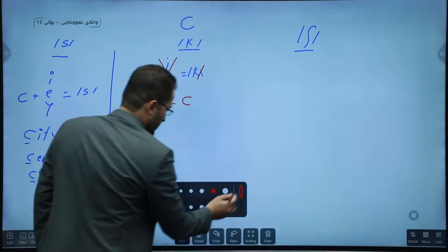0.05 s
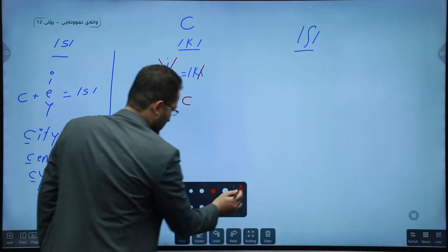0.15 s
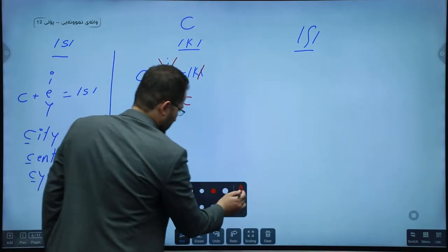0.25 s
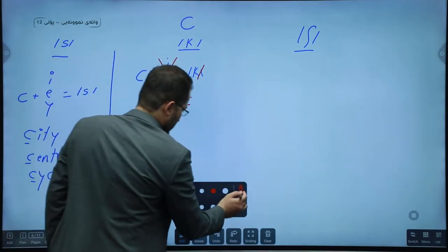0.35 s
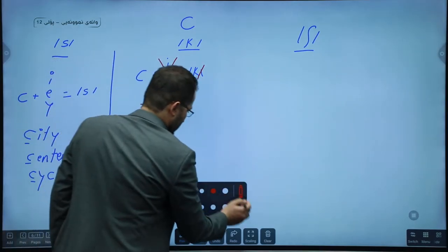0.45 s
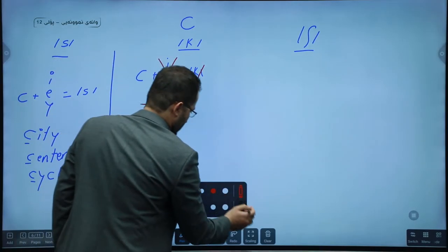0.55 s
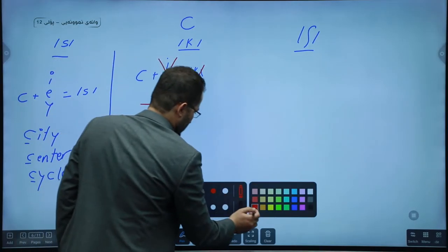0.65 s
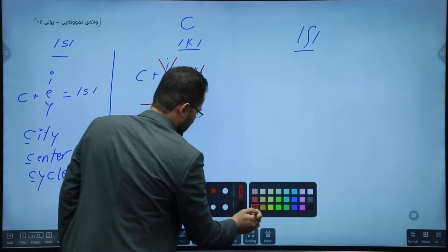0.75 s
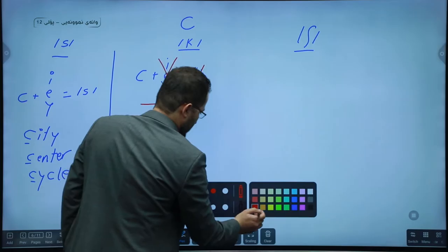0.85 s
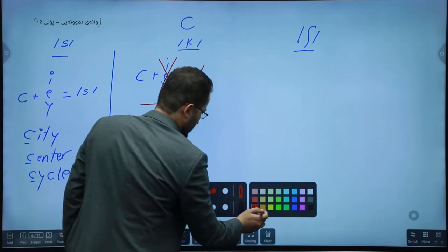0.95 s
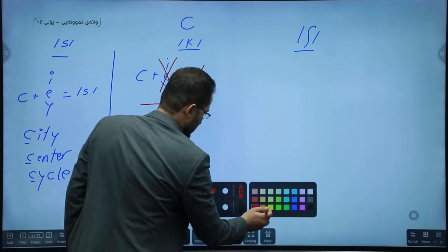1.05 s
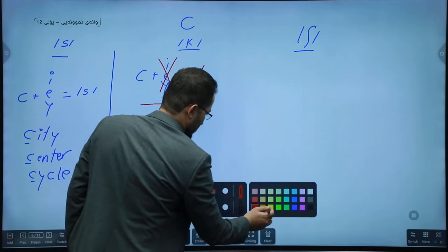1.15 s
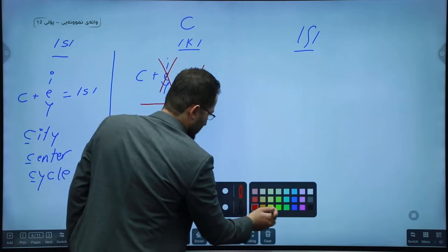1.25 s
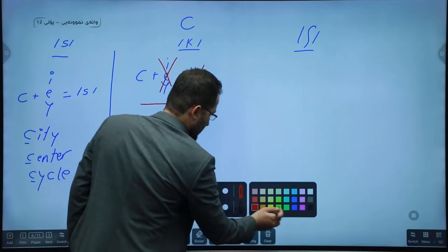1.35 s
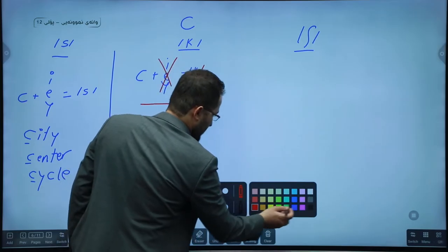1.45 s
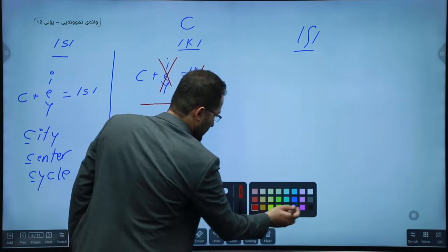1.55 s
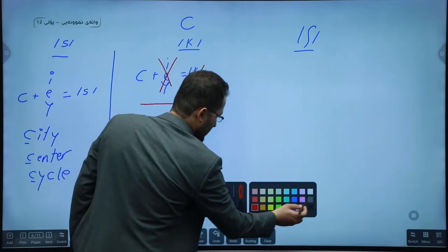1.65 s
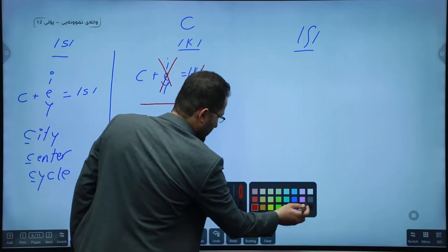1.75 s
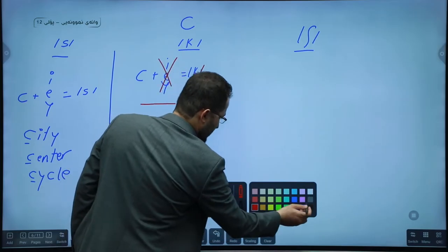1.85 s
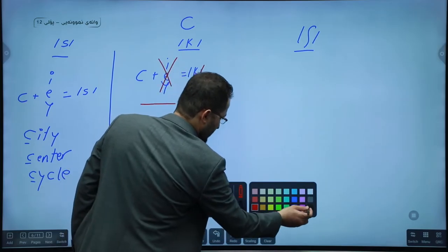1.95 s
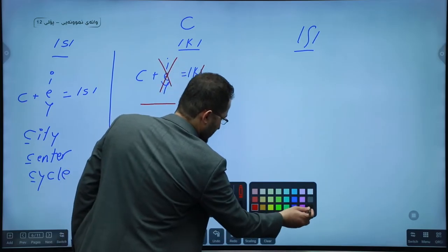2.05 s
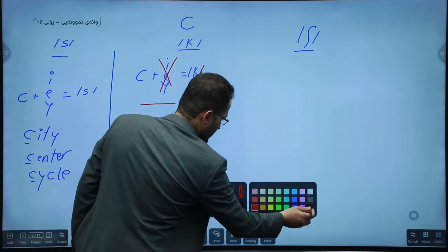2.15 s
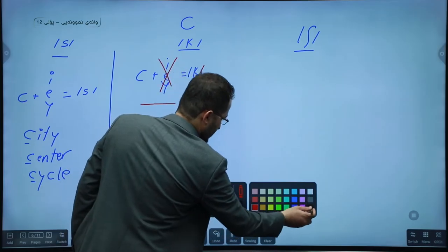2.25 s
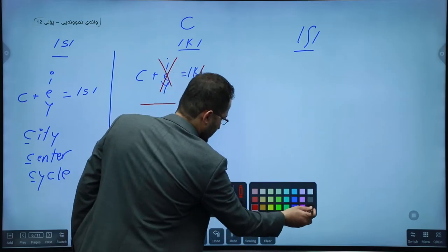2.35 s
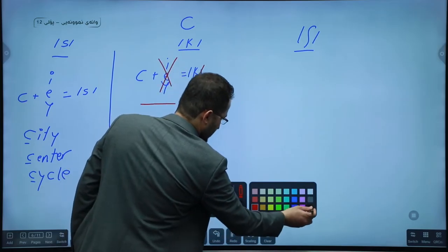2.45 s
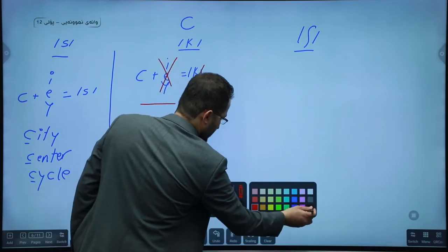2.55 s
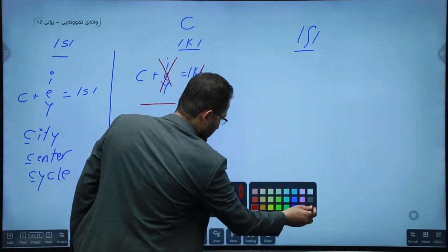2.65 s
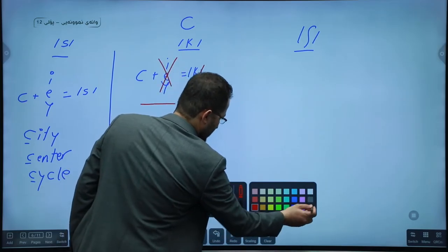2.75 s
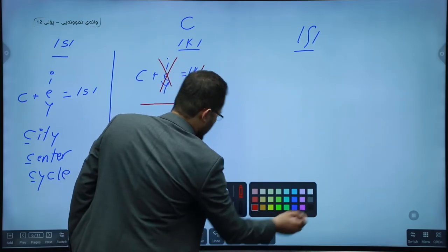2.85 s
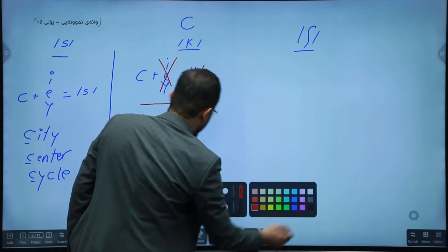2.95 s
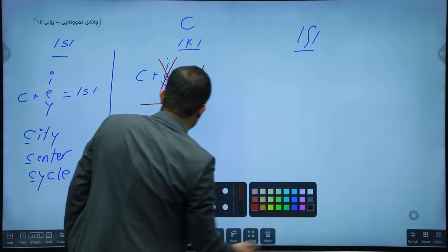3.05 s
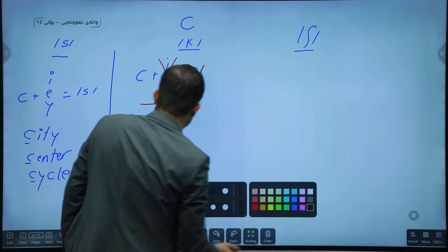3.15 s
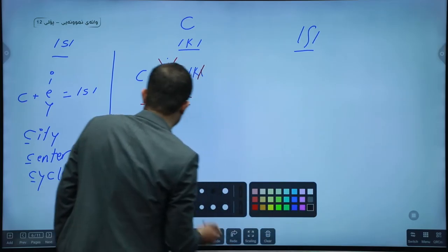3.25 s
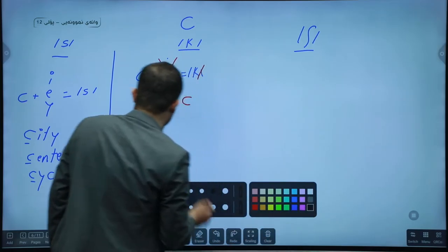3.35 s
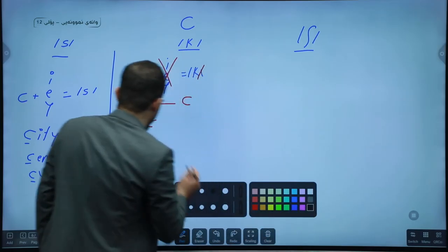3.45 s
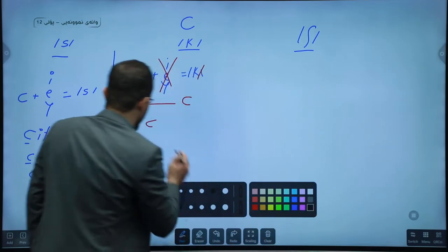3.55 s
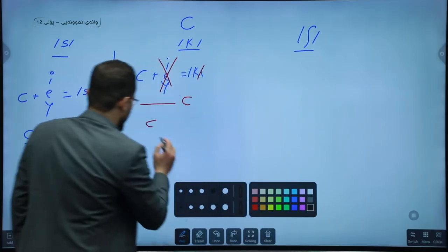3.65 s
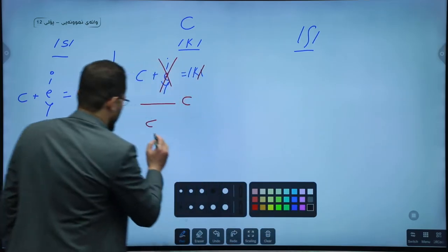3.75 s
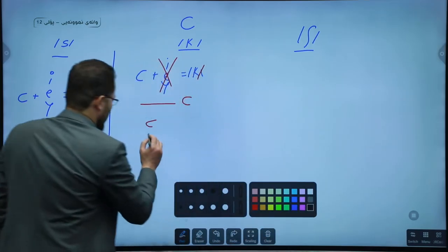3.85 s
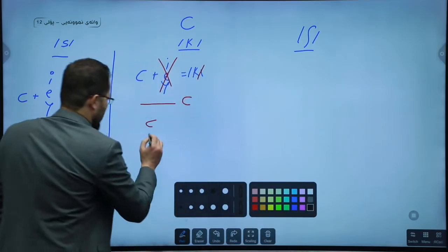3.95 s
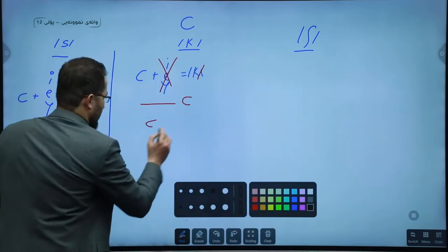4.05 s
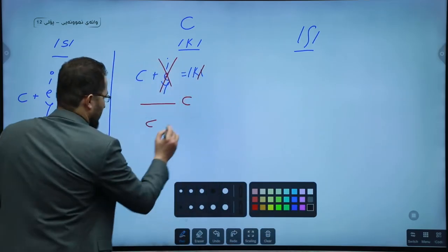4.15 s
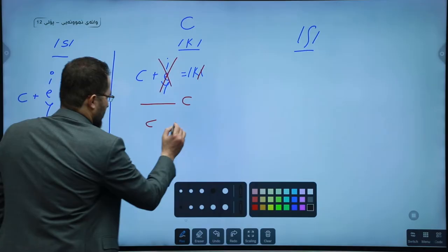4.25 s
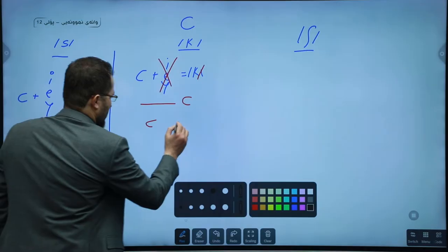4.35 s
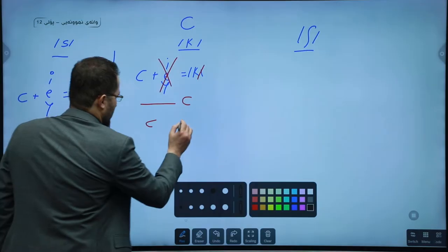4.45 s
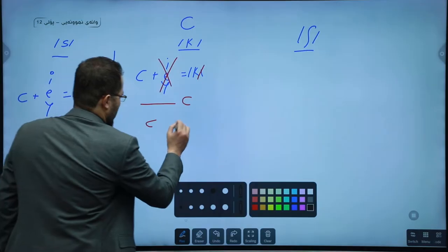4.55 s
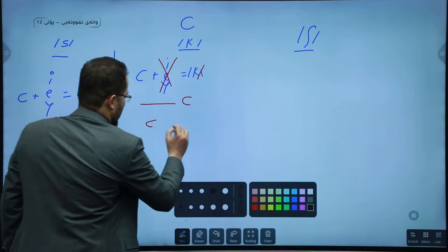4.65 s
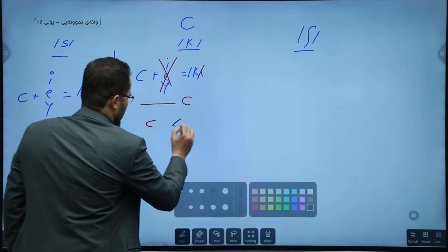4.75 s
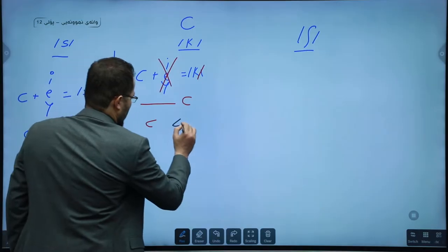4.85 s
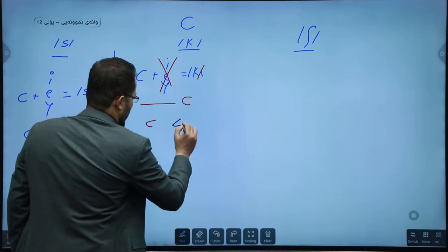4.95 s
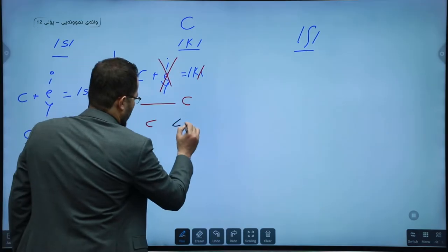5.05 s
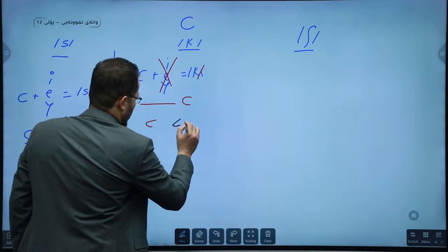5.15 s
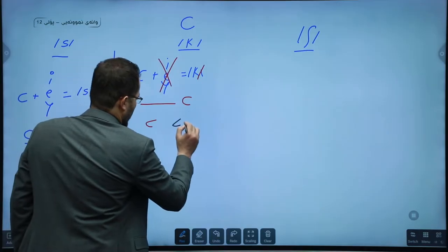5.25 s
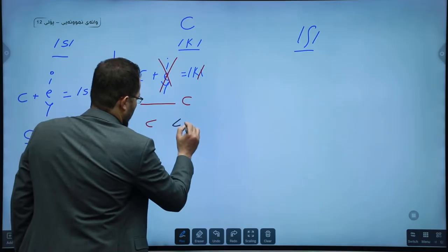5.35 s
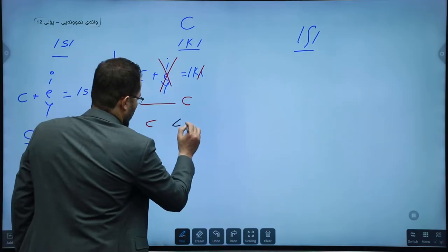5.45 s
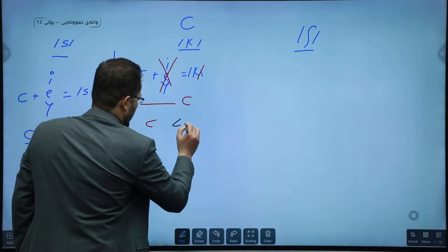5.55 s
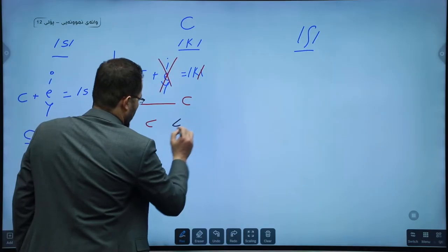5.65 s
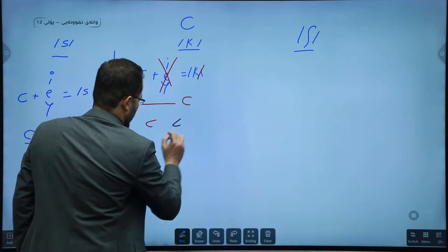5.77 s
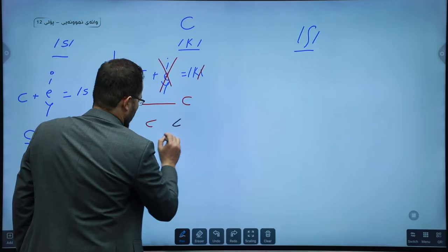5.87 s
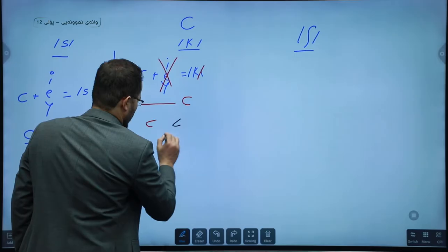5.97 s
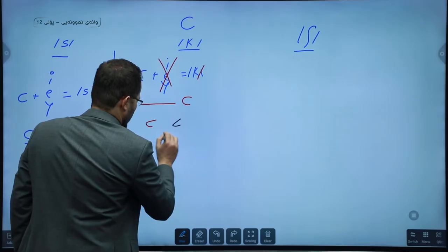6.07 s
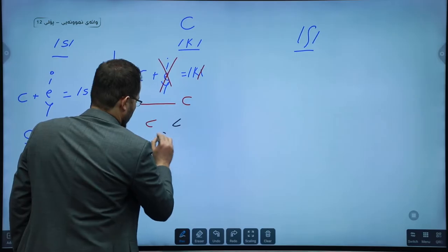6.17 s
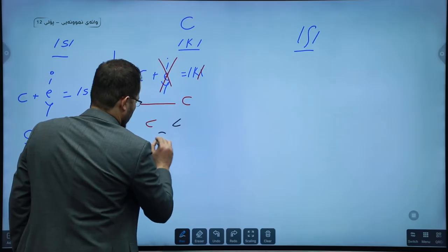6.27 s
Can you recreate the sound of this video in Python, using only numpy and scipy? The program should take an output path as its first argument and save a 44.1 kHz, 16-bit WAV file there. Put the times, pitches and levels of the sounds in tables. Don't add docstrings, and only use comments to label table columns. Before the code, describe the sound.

A quiet classroom with low ventilation rumble, a soft wash of air and steady microphone hiss throughout. At about 0.26 s a stylus strikes a large glass panel a few metres away: a loud, blunt thump with a hard tick, a hollow ring and a fluttering room tail lasting under a second. A slow, very faint sleeve movement follows near 0.9 s, with a barely audible squeak around 1.4 s. A second, slightly weaker knock lands at 2.65 s. From 3.1 to 4.2 s a jacket sleeve rubs, swishing most clearly at 4.0 s, with small body bumps. A softer, boomier knock comes at 4.56 s, then a thin faint squeak at 4.7-4.9 s. Soft low hand touches occur at 5.1, 5.3 and 5.5 s. From 5.85 s a low distant engine drone swells, sagging slightly, and a final dull thud without a noticeable tick sounds at 6.08 s, ringing until the end at about 6.3 s.

```python
import sys
import numpy as np
from scipy import signal
from scipy.fft import rfft, irfft
from scipy.io import wavfile
from scipy.ndimage import uniform_filter1d

SR = 44100
rng = np.random.default_rng(int(sys.argv[2]) if len(sys.argv) > 2 else 0)


def waveform_to_disk(signal):
    frames = np.transpose(np.atleast_2d(signal))
    scaled = np.clip(frames, -1, 1) * 32767
    samples = np.round(scaled).astype(np.int16)
    wavfile.write(sys.argv[1], SR, samples)


def magnitude_from_level(level_db):
    exponent = np.asarray(level_db, float) / 20
    return 10 ** exponent


N = 278271
TIME = np.arange(N) / SR

# time in seconds, level in dB.
AIR_FLOW = [(0, 2), (.9, -0.5), (2.2, -1.5), (3.1, 0), (4.9, 0), (5.5, 0.5), (6.31, 2.5)]
# frequency in Hz, level in dB per Hz.
RUMBLE_COLOUR = [(22, -32), (59, -5), (70, -6.5), (91, 1), (119, -8), (146, -3.5), (254, -13), (330, -25.5)]
# frequency in Hz, level in dB per Hz.
WASH_COLOUR = [(200, -28), (312, -22), (392, -19.5), (450, -23.5), (838, -24.5), (3000, -43.5),
               (3900, -55.5), (6600, -120)]
# frequency in Hz, width in Hz, level in dB.
DUCT_MODES = [(100.2, 10, -69.5), (244.5, 15, -71)]
RUMBLE_DB, WASH_DB, RUMBLE_GROWS_DB_PER_S = -60.5, -68.5, 0.35

# frequency in Hz, level in dB per Hz.
HISS_COMMON = [(590, -18), (1000, -2.5), (1230, -3.5), (1630, -4.5), (2620, -5), (3190, -5), (13600, -8),
               (16000, -9)]
# frequency in Hz, level in dB per Hz.
HISS_DIFFERING = [(18, -38), (30, -11), (71, -11), (336, -6.5), (1190, -7.5), (3140, -8), (13700, -8.5),
                  (16000, -10)]
HISS_COMMON_DB, HISS_DIFFERING_DB = -65, -67

# start in seconds, thump peak in dB, thump pitch in Hz, tick in dB, flutter depth in dB.
BLOWS = [
    (0.2572, -12, 540, -26.5, -1),
    (2.6536, -17, 530, -30.5, -1.5),
    (4.5557, -22, 520, -37, 8.5),
    (6.0752, -26, 448, -68.5, 4),
]
# frequency in Hz, level in dB, t60 in seconds.
MENU_RING = [(190.7, -18, 0.88), (258, 3.5, 0.18), (294.4, -13.5, 0.76), (426, -8, 0.51), (491, -12, 0.23),
             (680, -33, 0.48), (864, -14.5, 0.36), (914, -14, 0.35), (996, -22.5, 0.59), (1255, -33, 0.49),
             (1160, -27, 0.46), (629, -21, .3)]
# frequency in Hz, level in dB, t60 in seconds.
CORNER_RING = [(217, -9, 0.17), (252.5, 2.5, 0.22), (304, -8, 0.75), (389, -12, 0.57), (453, -19, 0.28),
               (590, -7, 0.43), (676, 5.5, 0.089), (820, -13, 0.22), (888, -21, 0.6), (903, -25, 0.36),
               (1127, -38, 0.98)]
# frequency in Hz, level in dB, t60 in seconds.
MIDDLE_RING = [(102, -15, 0.31), (139, -6.5, 0.62), (242.5, -11.5, 0.96), (377.5, 9.5, 0.093),
               (423, -11, 0.41), (490, -24, 0.28), (520, -28, 0.41), (638, -26, 0.18), (652, 0, 0.13),
               (749, -2.5, 0.16), (835, -25, 0.45), (970, -42, 0.55), (191, -3, 0.25)]
# frequency in Hz, level in dB, t60 in seconds.
LOWER_RING = [(137, -0.5, 0.42), (235, 4, 0.33), (333, -7.5, 0.58), (394.4, 0, 0.23), (426, -22, .7),
              (547, -17, 0.19), (604, -1, 0.11), (689, -30, 0.3), (790, -30, 0.25), (870, -30, 0.23),
              (187.6, -2, 0.52), (1230, -41, .6)]
# frequency in Hz, level in dB, t60 in seconds.
ROOM_HUM = [
    [(152.6, -9, 0.79), (180, 1.5, 0.59), (221.4, -5, 0.76), (246, -2.5, 0.78)],
    [(163.3, -3, 0.88), (209.6, 1.5, 0.87), (251, -4.5, 0.98), (327.5, -4.5, 0.75)],
    [(151.3, -11, 0.85), (180, -6.5, 0.97), (218, 6, 0.56), (239, 4.5, 0.78)],
    [(142.7, -4, 0.97), (218, 3, 1.1), (259, -1.5, 2), (176, -0.5, 0.8)],
]
# frequency in Hz, level against the thump in dB, t60 in seconds.
SHAFT_RING = [(1270, -24.5, 0.033), (1860, -41, 0.011)]
# frequency in Hz, level in dB, t60 in seconds.
TIP_RING = [(2300, -6, 0.0045), (3780, -11.5, 0.0074), (5000, -5, 0.0038), (6200, -7.5, 0.0025),
            (8200, -1.5, 0.001), (12400, -7.5, 0.0032)]
# frequency in Hz, level in dB per Hz.
ROOM_COLOUR = [(60, -45), (140, -6), (200, -12.5), (280, 0), (400, -7), (600, -7), (1200, -28),
               (2300, -34.5)]
# frequency in Hz, level in dB per Hz.
BRIGHT_COLOUR = [(1100, 8), (1500, -12), (2500, -7), (4000, -7), (6500, -11), (9000, -11), (15000, -20.5)]
# frequency in Hz, t60 in seconds.
ROOM_DECAY = [(100, 0.64), (250, 0.64), (600, 0.35), (1500, 0.83), (3000, 0.14), (6000, 0.07),
              (12000, 0.15)]
RING_DB, HUM_DB, ROOM_DB, BRIGHT_DB = -11.5, -15.5, -13.5, -32.5
ROOM_SLOPE, BRIGHT_SLOPE = 1.132, 1.41
RECOIL_DB, RECOIL_HZ, RECOIL_T60_S = -8, 190, .035
ECHO_S, ECHO_DB = 0.012, -6
FLUTTER_S, FLUTTER_FIRST_S = 0.0462, .016
FLUTTER_TOP_HZ, FLUTTER_FADE_S = 504, 0.21
SOFT_TURNS = 2.07
BLOW_LOW_CUT_HZ = 36

# frequency in Hz, width in Hz, level in dB.
CLOTH_FOLDS = [
    [(655, 210, 5.5), (854, 250, 5)],
    [(1650, 350, 4), (2100, 810, 10.5)],
    [(3380, 2200, 17), (5800, 2200, -10)],
]
# time of the height in seconds, level in dB, rise in seconds, fall in seconds,
# brightness in dB.
SLEEVE_STROKES = [
    (.9, -74.5, 0.54, 0.58, -14),
    (3.12, -70, 0.18, 0.14, 3.5),
    (3.48, -67, 0.11, .25, -4),
    (3.75, -73, 0.19, 0.14, 3.5),
    (3.884, -66, 0.019, 0.013, 0.5),
    (4.01, -52.5, 0.099, 0.1, 0.5),
    (4.14, -67, 0.041, 0.23, 0.5),
]
# start in seconds, peak in dB, pitch in Hz.
BODY_BUMPS = [
    (3.879, -42, 135),
    (4.128, -37, 159),
    (4.209, -48, 740),
    (4.239, -42.5, 265),
]
FADE_DB, FIBRE_DB, FIBRE_LAG_S = 10, -6, .03

# start in seconds, end in seconds, pitch in Hz, level in dB.
TIP_SQUEAKS = [
    (4.72, 4.86, 2320, -75),
    (4.74, 4.88, 2030, -78),
    (4.26, 4.34, 2310, -77),
    (1.38, 1.48, 1680, -78),
]

# start in seconds, level in dB.
HAND_TOUCHES = [
    (5.12, -57.5),
    (5.275, -50),
    (5.515, -48.5),
]

DRONE_HZ, DRONE_DB, DRONE_SAG_HZ_PER_S = 115, -55, 2
DRONE_FROM_S, DRONE_RISE_S = 5.85, .04


def unit(x):
    return x / np.sqrt(np.mean(x ** 2))


def on_log(hz, table):
    f, v = np.transpose(table)
    return np.interp(np.log(np.maximum(hz, 1)), np.log(f), v, left=-120, right=-120)


def coloured(table, size=N):
    spec = rfft(rng.standard_normal(size))
    hz = np.arange(len(spec)) * SR / size
    return unit(irfft(spec * magnitude_from_level(on_log(hz, table)), size))


def band(x, hz, width):
    return signal.lfilter(*signal.iirpeak(hz, hz / width, SR), x)


def low(x, hz):
    return signal.sosfilt(signal.butter(2, hz, fs=SR, output="sos"), x)


def walk(rate):
    k = int(SR / rate)
    held = np.repeat(rng.standard_normal(N // k + 1), k)
    return unit(uniform_filter1d(uniform_filter1d(held, k), k)[:N])


def add(out, at_s, x):
    i = int(at_s * SR)
    out[i:i + len(x)] += x[:len(out) - i]


def ring(modes, t, phases, build):
    return sum(magnitude_from_level(db - 60 * t / t60) * (1 - np.exp(-t * hz / build)) * np.sin(2 * np.pi * hz * t + p)
               for (hz, db, t60), p in zip(modes, phases))


def air():
    flow_db = np.interp(TIME, *np.transpose(AIR_FLOW))
    rumble_db = RUMBLE_DB + RUMBLE_GROWS_DB_PER_S * TIME + flow_db + 0.69 * walk(10.0)
    rumble = coloured(RUMBLE_COLOUR) * magnitude_from_level(rumble_db)
    duct = sum(magnitude_from_level(db + 2.5 * flow_db) * unit(band(rng.standard_normal(N), hz, width))
               for hz, width, db in DUCT_MODES)
    wash = coloured(WASH_COLOUR) * magnitude_from_level(WASH_DB + 1.27 * flow_db + .5 * walk(3.55))
    return rumble + duct + wash


def microphone_hiss():
    common = magnitude_from_level(HISS_COMMON_DB) * coloured(HISS_COMMON)
    differing = magnitude_from_level(HISS_DIFFERING_DB) * coloured(HISS_DIFFERING)
    return common + differing * np.array([[1], [-1]])


def diffuse(table, t, rise_s):
    noise, out = coloured(table, size=len(t)), 0
    decay_hz, decay_s = np.transpose(ROOM_DECAY)
    for hz in 90 * 2 ** np.arange(0, 7.5, .5):
        t60 = np.interp(np.log(hz), np.log(decay_hz), decay_s)
        out = out + band(noise, hz, hz / 3) * magnitude_from_level(-60 * t / t60)
    return out * (1 - np.exp(-t / rise_s))


def panel_thump(t, thump_db, hz):
    turns = t * hz
    swell = np.sin(np.pi * np.minimum(turns / 1.12, 1) ** 1.05)
    return -magnitude_from_level(thump_db) * np.sin(2 * np.pi * turns) * swell


def panel_recoil(t, thump_db, hz):
    late = np.maximum(t - .5 / hz, 0)
    return magnitude_from_level(thump_db + RECOIL_DB - 60 * late / RECOIL_T60_S) * np.sin(2 * np.pi * RECOIL_HZ * late)


def knocks():
    out, t = np.zeros(N), TIME[:SR]
    spots = (MENU_RING, CORNER_RING, MIDDLE_RING, LOWER_RING)
    for (s, thump_db, hz, tick_db, flutter_db), modes, lows in zip(BLOWS, spots, ROOM_HUM):
        thump = panel_thump(t, thump_db, hz)
        recoil = panel_recoil(t, thump_db, hz)
        shaft = magnitude_from_level(thump_db) * ring(SHAFT_RING, t, np.zeros(len(SHAFT_RING)), build=0.4)
        phases = rng.uniform(0, 2 * np.pi, (2, 30))
        body = magnitude_from_level(thump_db + RING_DB) * ring(modes, t, phases[0], build=1.0)
        body = body * (1 - np.exp(-(t / 0.0083) ** 2))
        hum = magnitude_from_level(thump_db + HUM_DB) * ring(lows, t, phases[1], build=21.4)
        room = magnitude_from_level(ROOM_SLOPE * thump_db + ROOM_DB) * diffuse(ROOM_COLOUR, t, 0.0026)
        bright = magnitude_from_level(BRIGHT_SLOPE * thump_db + BRIGHT_DB) * diffuse(BRIGHT_COLOUR, t, 0.00033)
        tail = body + hum + low(room, SOFT_TURNS * hz)
        wave = np.cos(2 * np.pi * (t - FLUTTER_FIRST_S) / FLUTTER_S)
        flutter_gain = magnitude_from_level(flutter_db * np.exp(-t / FLUTTER_FADE_S) * wave)
        flutter = (flutter_gain - 1) * low(tail, FLUTTER_TOP_HZ)
        add(out, s, thump + recoil + shaft + bright + tail + flutter)
        add(out, s + ECHO_S, magnitude_from_level(ECHO_DB) * low(thump, 1140))
        tick = magnitude_from_level(tick_db + 4.0) * ring(TIP_RING, t, np.zeros(len(TIP_RING)), build=0.54)
        add(out, s + 0.00042, tick)
    return signal.sosfilt(signal.butter(2, BLOW_LOW_CUT_HZ, "high", fs=SR, output="sos"), out)


def stroke(s, rise_s, fall_s):
    away = np.where(TIME < s, (s - TIME) / rise_s, (TIME - s) / fall_s)
    return magnitude_from_level(-FADE_DB * away ** 1.63)


def cloth(slips, folds):
    return unit(sum(magnitude_from_level(db) * band(band(slips, hz, 1.77 * width), hz, 1.8 * width)
                    for hz, width, db in folds))


def sleeve():
    bursts = np.minimum(rng.exponential(size=N // 30 + 1), 4).repeat(30)[:N]
    slips = rng.standard_normal(N) * magnitude_from_level(2.2 * bursts)
    large, small, fibres = (cloth(slips, folds) for folds in CLOTH_FOLDS)
    out = np.zeros(N)
    for s, db, rise, fall, bright_db in SLEEVE_STROKES:
        rub = stroke(s, rise, fall) * (large + magnitude_from_level(bright_db) * small)
        trail = magnitude_from_level(FIBRE_DB + 2 * bright_db) * stroke(s + FIBRE_LAG_S, rise, fall) * fibres
        out += magnitude_from_level(db) * (rub + trail)
    t = TIME[:SR // 10]
    for s, db, hz in BODY_BUMPS:
        bump = magnitude_from_level(db - 60 * t / 0.029) * np.sin(2 * np.pi * hz * t)
        add(out, s, bump * (1 - np.exp(-t / 0.0009)))
    return out


def squeaks():
    waver = np.cumsum(1 + .003 * walk(30)) / SR
    out = np.zeros(N)
    for start, end, hz, db in TIP_SQUEAKS:
        fade = np.interp(TIME, [start - .02, start, end, end + 0.051], [0, 1, 1, 0])
        out += magnitude_from_level(db) * np.sin(2 * np.pi * hz * waver) * fade
    return out


def touches():
    out = np.zeros(N)
    for s, db in HAND_TOUCHES:
        add(out, s, ring([(247, db, .3)], TIME[:SR // 2], [0], build=4.6))
    return out


def drone():
    since = np.maximum(TIME - DRONE_FROM_S, 0)
    phase = 2 * np.pi * np.cumsum(DRONE_HZ - DRONE_SAG_HZ_PER_S * since) / SR
    swell = magnitude_from_level(DRONE_DB + 4 * since) * (1 - np.exp(-since / DRONE_RISE_S))
    return np.sqrt(2) * swell * (np.sin(phase) + magnitude_from_level(-15.0) * np.sin(2 * phase))


def scene():
    mid = air() + knocks() + sleeve() + squeaks() + touches() + drone()
    return np.array([mid, mid])


def roll_off(x):
    return signal.sosfilt(signal.butter(12, 15720, fs=SR, output="sos"), x)


def record(dry):
    return roll_off(dry + microphone_hiss())


dry = scene()
out = record(dry)
waveform_to_disk(out)
```